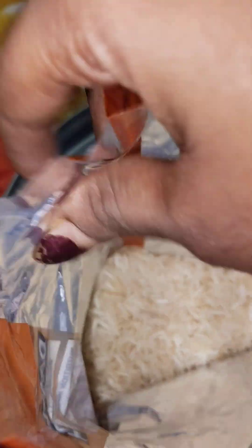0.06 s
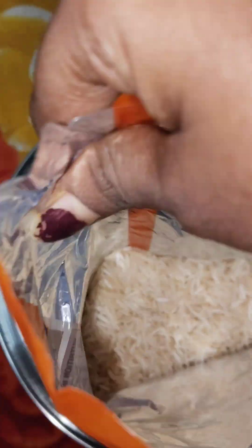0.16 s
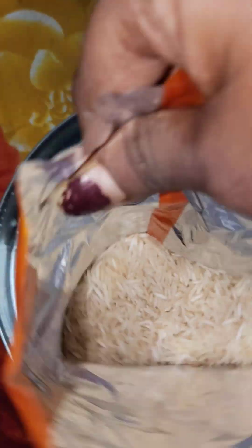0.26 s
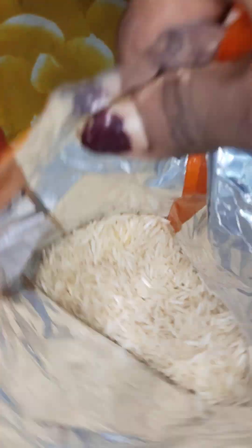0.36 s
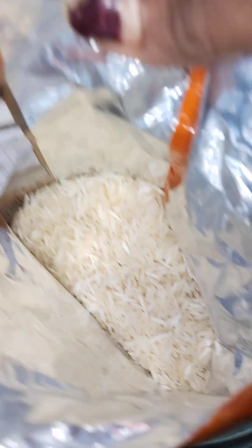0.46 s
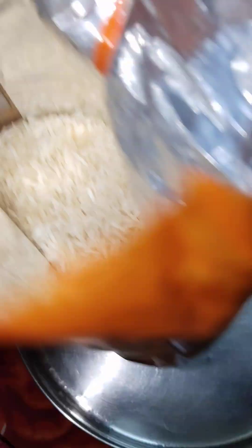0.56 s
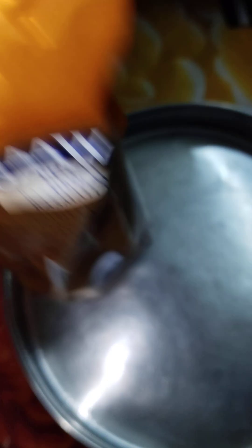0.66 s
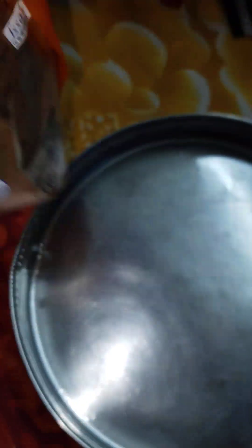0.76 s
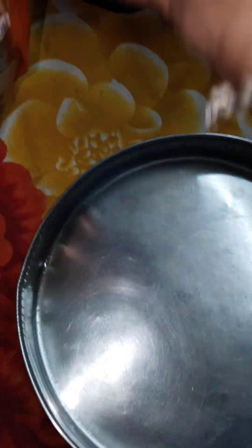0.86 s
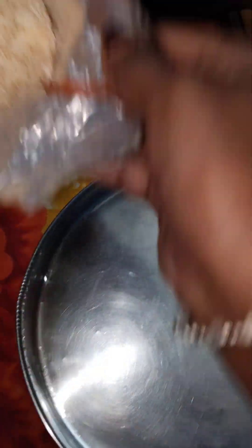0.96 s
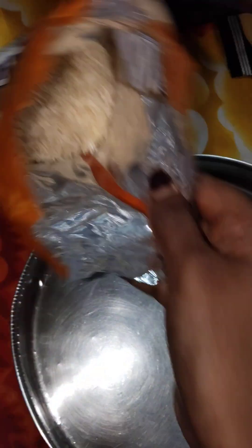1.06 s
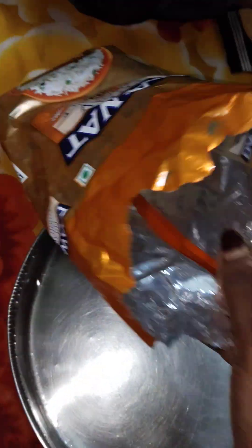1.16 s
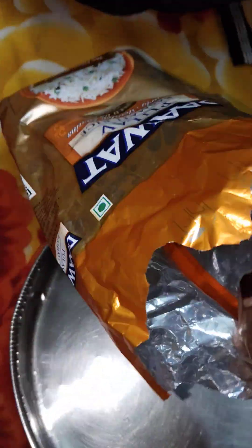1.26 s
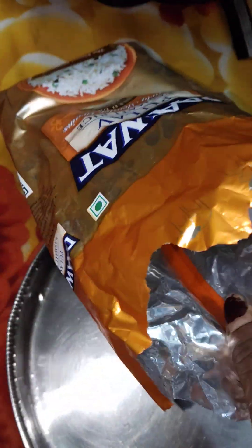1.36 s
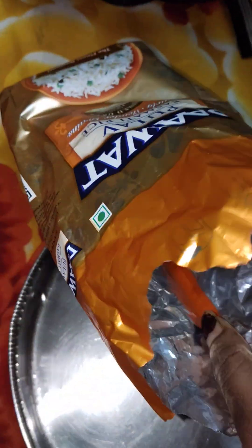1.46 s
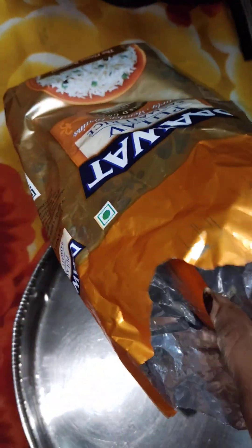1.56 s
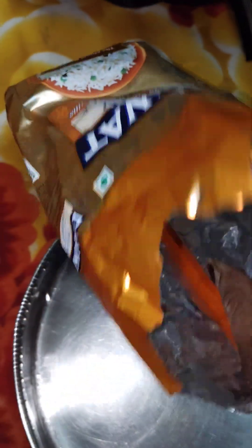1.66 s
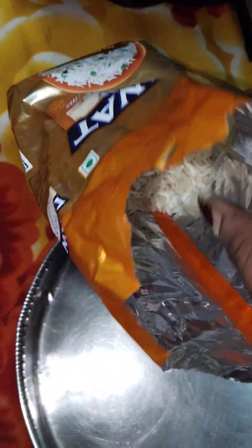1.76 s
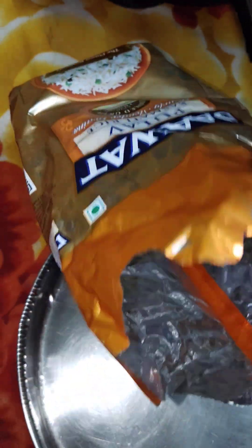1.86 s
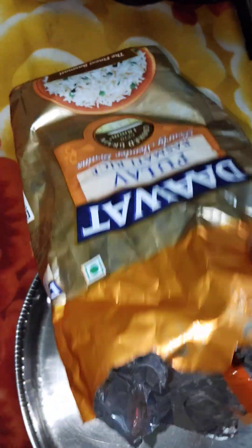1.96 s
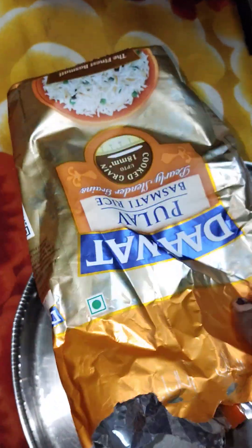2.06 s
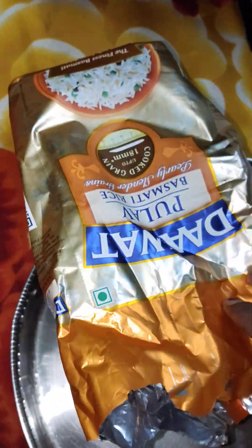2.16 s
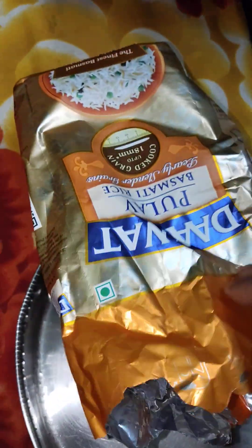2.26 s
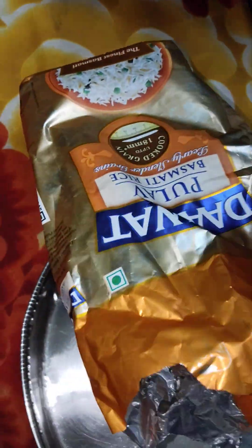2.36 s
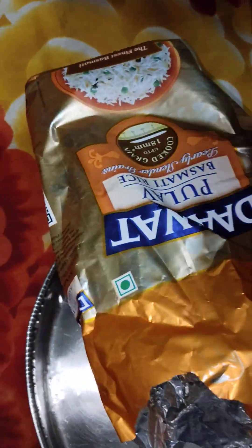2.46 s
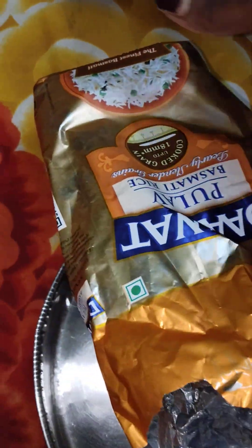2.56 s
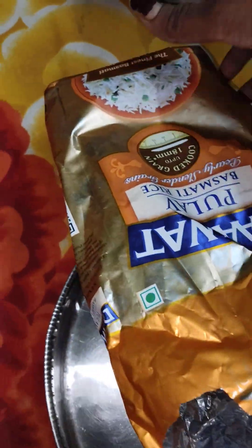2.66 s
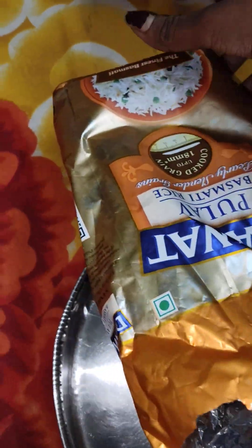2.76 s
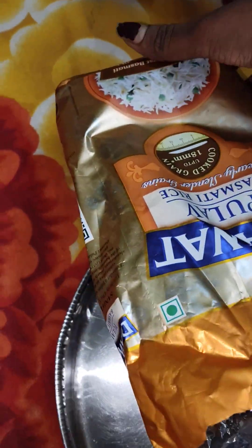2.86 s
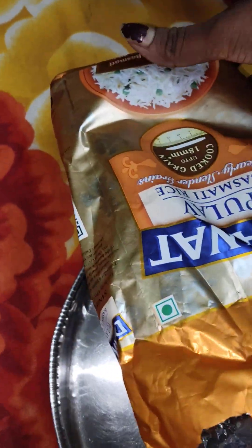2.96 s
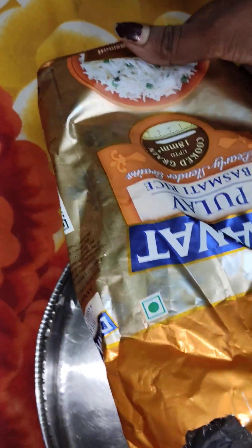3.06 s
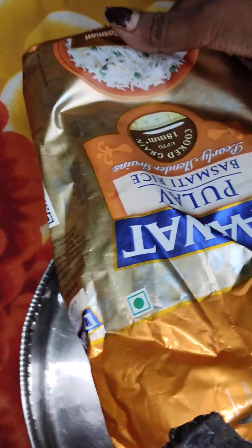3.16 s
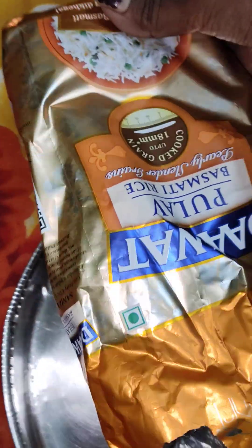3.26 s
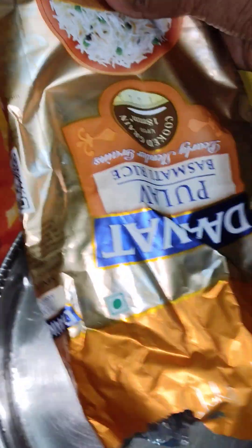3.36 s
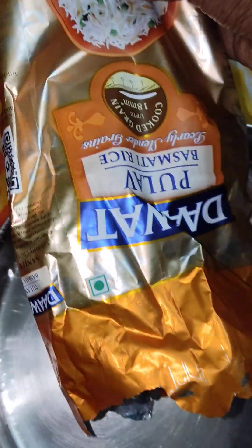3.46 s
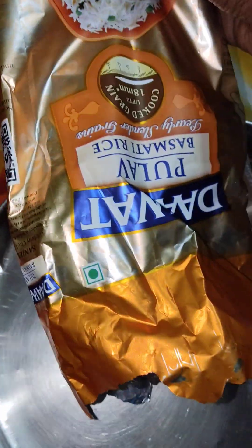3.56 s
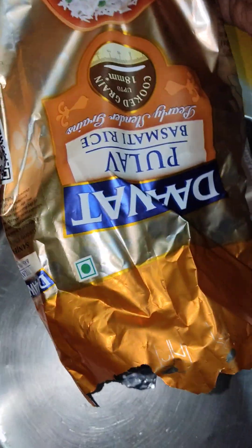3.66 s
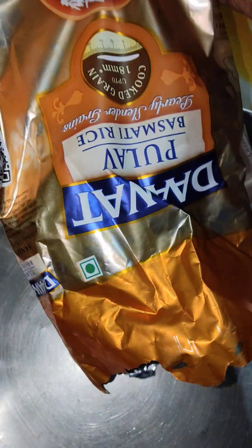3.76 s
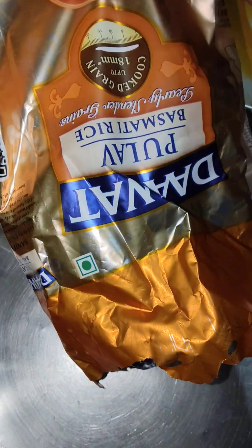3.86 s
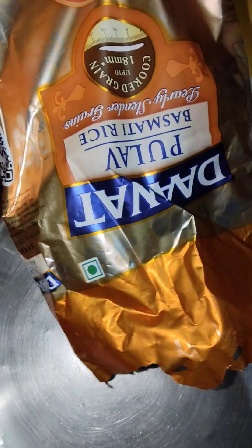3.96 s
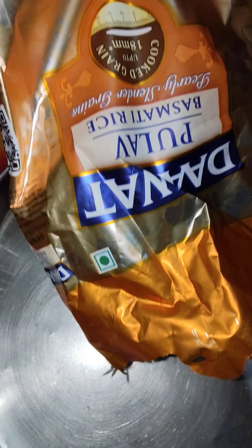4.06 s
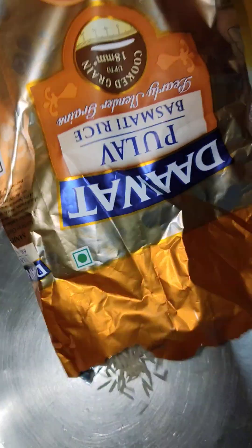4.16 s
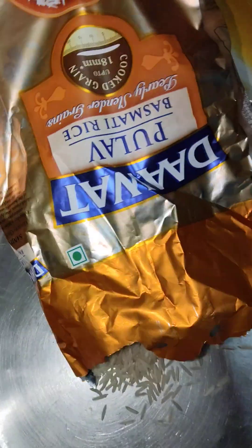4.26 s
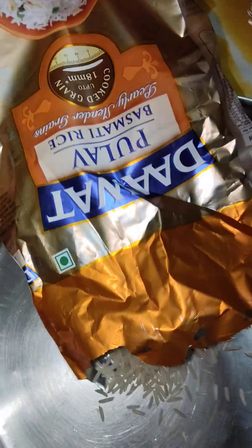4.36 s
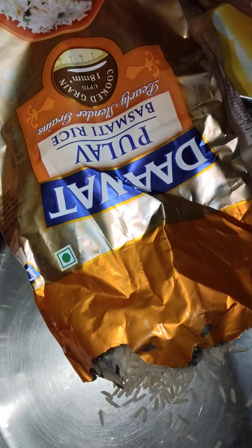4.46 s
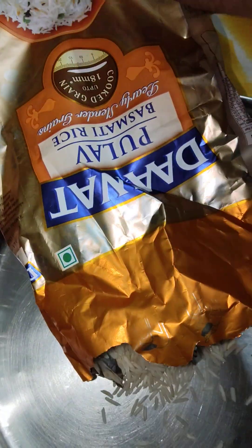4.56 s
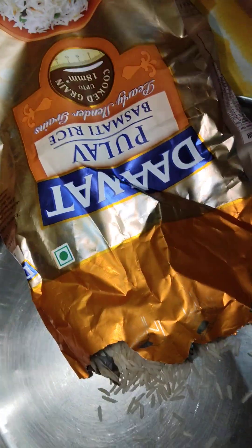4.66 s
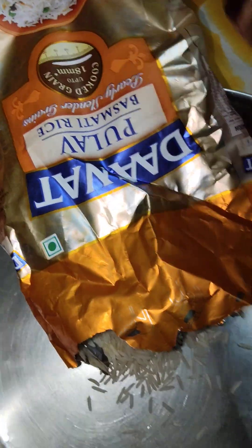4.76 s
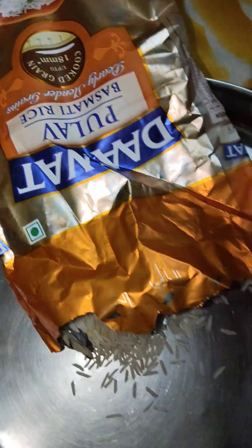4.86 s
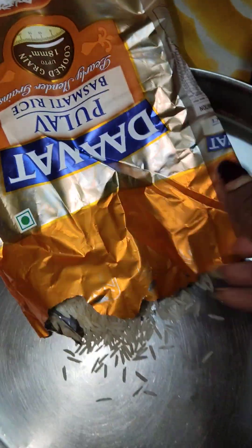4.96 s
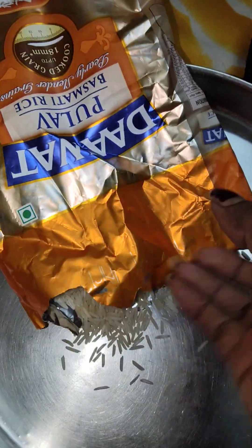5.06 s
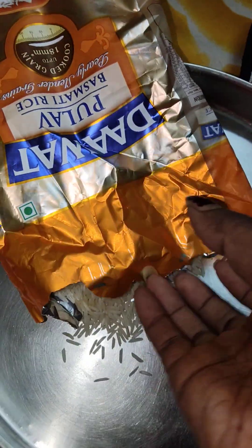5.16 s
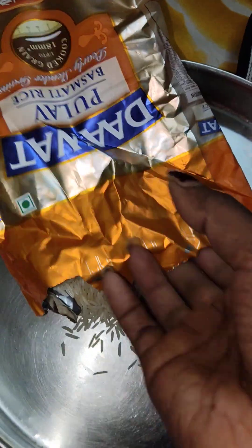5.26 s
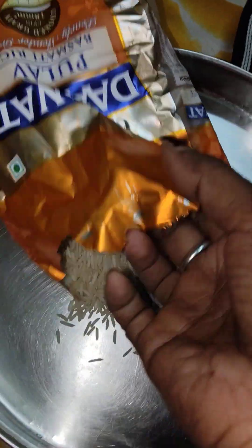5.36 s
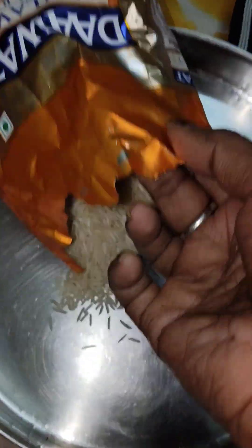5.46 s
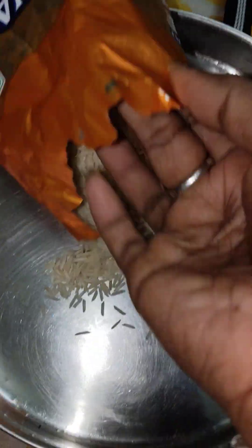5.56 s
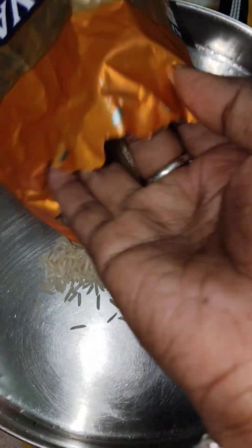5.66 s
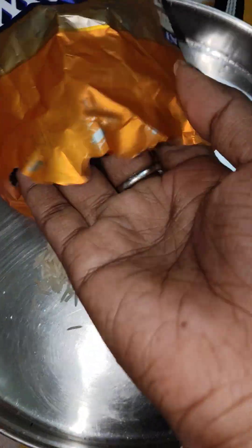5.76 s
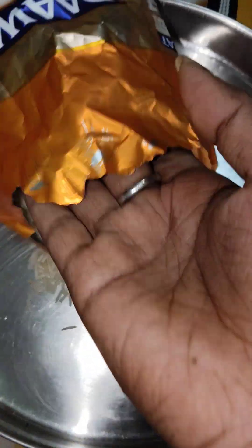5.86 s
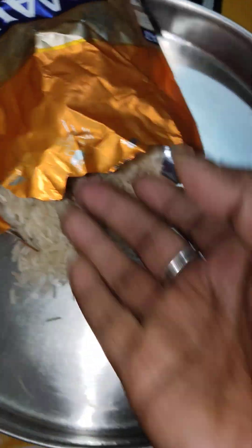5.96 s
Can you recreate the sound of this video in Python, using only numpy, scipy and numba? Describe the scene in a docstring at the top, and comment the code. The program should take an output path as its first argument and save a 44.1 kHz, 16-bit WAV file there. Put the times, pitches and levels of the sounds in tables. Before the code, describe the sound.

A stiff foil-lined bag crackles close to the microphone, then dry rice slides out with a hissing rattle onto a steel plate.

```python
"""In a small furnished room, a foil-lined bag of dry rice is handled close to a microphone,
laid on a steel plate, lifted and tipped out. Creases snap through and ring the stiff film and the air
in the pouch, over a rustle of tiny wrinkles. Sliding rice is a dense hiss of filtered impacts; landing
grains ring the plate's modes. Dull knocks, pushed air, faint hiss and room reflections join them."""
import sys
import numpy as np
from scipy import signal
from scipy.fft import rfft, irfft
from scipy.io import wavfile
from scipy.ndimage import uniform_filter1d
from numba import njit

SR = 44100
rng = np.random.default_rng(int(sys.argv[2]) if len(sys.argv) > 2 else 0)


def waveform_to_disk(signal):
    """Save audio, clipped to [-1, 1], as 16-bit WAV at the path in sys.argv[1]."""
    frames = np.transpose(np.atleast_2d(signal))
    scaled = np.clip(frames, -1, 1) * 32767
    samples = np.round(scaled).astype(np.int16)
    wavfile.write(sys.argv[1], SR, samples)


N = 264600
TIME = np.arange(N) / SR  # seconds


def undb(db):
    """Logarithmic level: decibels become an amplitude gain."""
    return 10 ** (np.asarray(db) / 20)


def unit(x):
    """Normalisation: each sound is scaled to an rms of one."""
    return x / np.sqrt(np.mean(x ** 2, axis=-1, keepdims=True) + 1e-18)


def band(x, lo_hz, hi_hz, order=2):
    """Band limitation by a causal Butterworth filter."""
    sos = signal.butter(order, [lo_hz, min(hi_hz, .48 * SR)], "band", fs=SR, output="sos")
    return signal.sosfilt(sos, x)


def resonate(x, hz, q):
    """Simple resonance, with a gain of one at its centre."""
    return signal.lfilter(*signal.iirpeak(hz, max(q, 1), fs=SR), x)


@njit
def sweep(x, hz, q):
    """Moving resonance: a state-variable band-pass whose centre follows hz."""
    y, b, low = np.empty(len(x)), 0., 0.
    for i in range(len(x)):
        g = np.tan(np.pi * hz[i] / SR)
        v = (b + g * (x[i] - low)) / (1 + g * (g + 1 / q))
        b, low, y[i] = 2 * v - b, low + 2 * g * v, v / q
    return y


def modes(pushes, pitches_hz, q):
    """Modal superposition: each push (a row) rings its own short modes of equal strength."""
    length = pushes.shape[-1]
    rings = (sweep(pushes.ravel(), np.repeat(hz, length), float(q)) for hz in pitches_hz.T)
    return unit(sum(unit(ring.reshape(pushes.shape)) for ring in rings))


def colour(x, points):
    """Spectral shaping: a long sound is weighted by (Hz, dB) points on a log frequency axis."""
    hz, db = np.transpose(points)
    f = np.arange(N // 2 + 1) * SR / N
    gain = undb(np.interp(np.log(f + 1), np.log(hz), db))
    return irfft(rfft(x) * gain, N)


def walk(rate):
    """Slow random modulation: smoothed steps, rate a second, with an rms of one."""
    k = int(SR / rate)
    steps = np.repeat(rng.standard_normal(N // k + 1), k)
    return unit(uniform_filter1d(steps, k)[:N])


def clicks(rate, spread_db):
    """Poisson impacts: rate impulses a second, of random sign and exponentially spread level."""
    out = 1. * (rng.random(N) < rate / SR)
    at = np.flatnonzero(out)
    pool = N // 32
    size = undb(spread_db * np.minimum(rng.exponential(size=pool), 3.2))
    signed = size * rng.choice([-1, 1], pool)
    out[at] = np.resize(signed, len(at))
    return out


def crackle(rate, spread_db, q):
    """Impact excitation: every tiny impact rings for a few cycles at one of twenty pitches."""
    pitches = np.geomspace(200, 14500, num=20)
    return unit(sum(resonate(clicks(rate / len(pitches), spread_db), hz, q) for hz in pitches))


def fade_top(x, top_db, bright_db=-40, slope=.9):
    """Level-dependent brightness: the range above 11.9 kHz fades when the treble level is low."""
    dull = signal.sosfiltfilt(signal.butter(8, 11900, fs=SR, output="sos"), x)
    fizz = x - dull
    return dull + fizz * undb(np.clip(slope * (top_db - bright_db), -20, 0))


def follow(rows, at, column=1):
    """Envelope interpolation: a level curve in dB, silent outside its span."""
    rows = np.array(rows)
    return np.interp(at, rows[:, 0], rows[:, column], left=-120, right=-120)


# Share of the sharpness that goes to the crack and to the tick
CRACK_SHARE, TICK_SHARE = 0.9, 1.16


def registers(panel_db, sharp_db, pouch_db):
    """Spectral balance of pouch, panel, crack and tick: a sharper fold sends more to the top."""
    crack_db = panel_db + CRACK_SHARE * sharp_db
    tick_db = panel_db + TICK_SHARE * sharp_db
    return np.array([panel_db + pouch_db, panel_db, crack_db, tick_db])


# The registers of the film: pouch, panel, crack and tick.
# Each row: lower edge in Hz, upper edge in Hz.
REGISTER_BANDS = [(130, 650), (650, 3000), (3000, 7000), (7000, 16000)]


def played(grains, levels_db, gains_db):
    """Subband synthesis: each register of a stream of grains follows its own level."""
    gains = uniform_filter1d(undb(levels_db), size=200)
    stream = 0
    for (lo, hi), gain, db in zip(REGISTER_BANDS, gains, gains_db):
        stream = stream + unit(band(grains, lo, hi, order=4)) * gain * undb(db)
    return fade_top(stream, levels_db[-1] + gains_db[-1], bright_db=-39.5, slope=.9)


# Spectrum of the faint room hiss. Each row: frequency in Hz, relative level in dB.
HISS_COLOUR = [(30, -15.5), (80, 4.5), (160, 3.5), (500, 3), (800, -9), (1500, -5), (3400, -17.5),
               (4500, -13.5), (5350, 3.5), (6300, -40.5), (8750, -1), (11000, -27.5), (13000, -39.5),
               (16000, -45)]
HISS_DB = -69.5


def room_hiss():
    """Stationary noise: coloured Gaussian noise at a steady low level."""
    return undb(HISS_DB) * unit(colour(rng.standard_normal(N), HISS_COLOUR))


# Spectrum of the rustling film. Each row: frequency in Hz, relative level in dB.
FILM_COLOUR = [(60, -28.5), (130, -8), (240, -4), (420, -6.5), (750, -11), (1150, -5), (1700, 0),
               (2300, -6), (2900, -8), (4000, -6.5), (5500, -11.5), (7000, -14), (8900, 2), (11000, -6.5),
               (15500, -24.5)]
# Effort of the hand in each move. Each row: time in seconds, rustle level in dB before RUSTLE_DB.
HOLD_OPEN = [(0, -47), (0.17, -47), (0.27, -33), (0.4, -42.5), (0.47, -32.5), (0.54, -47.5)]
EASE_OFF = [(0.5, -29.5), (0.62, -53.5), (0.68, -49), (0.84, -49.5)]
TIP_OVER = [(0.84, -51.5), (0.9, -48), (0.99, -55), (1.13, -43.5), (1.2, -29.0), (1.27, -29.5), (1.38, -35),
            (1.52, -55)]
LAY_DOWN = [(1.52, -62), (1.59, -41), (1.8, -53), (1.86, -36.5), (2.06, -52)]
LET_GO = [(2.06, -57.5), (2.14, -32.5), (2.26, -40), (2.43, -50), (2.51, -71)]
LIFT_END = [(2.92, -92), (2.958, -58.5), (3.0, -89.5), (3.12, -75.5), (3.175, -51), (3.22, -60.5),
            (3.3, -60.5), (3.42, -43)]
REACH_IN = [(5, -70), (5.09, -44), (5.18, -54.5), (5.39, -50.5), (5.51, -43.5), (5.62, -38), (5.76, -42),
            (6, -47.5)]
# The moves of the hand: a slack bag sounds dull and full, a taut one sharp and thin.
# Each row: effort curve, sharpness in dB, pouch against panel in dB.
MOVES = [(HOLD_OPEN, -9.5, 1.5), (EASE_OFF, -19, -1), (TIP_OVER, -2.5, -12.5), (LAY_DOWN, -8.5, -0.13),
         (LET_GO, -4, -3.5), (LIFT_END, -1, -8), (REACH_IN, -7, -1.5)]
RUSTLE_DB = -1.5


def rustle():
    """Random buckling: tiny wrinkles give way in flurries while film and grains rub."""
    wrinkles = crackle(rate=1900, spread_db=-2.5, q=5)
    wrinkles = wrinkles + undb(-4) * unit(clicks(rate=290, spread_db=3.0))
    flurries = undb(6.5 * walk(rate=110))
    rubbing = undb(-3.5) * rng.standard_normal(N)
    grains = colour(unit(wrinkles * flurries) + rubbing, FILM_COLOUR)
    grains = grains + .6 * resonate(grains, 8900, 8)
    moves = [registers(follow(curve, TIME) + RUSTLE_DB, sharp, pouch) for curve, sharp, pouch in MOVES]
    # the strongest move sets each register
    return played(grains, np.max(moves, axis=0), gains_db=(1.2, 1.5, 0.52, 2.7))


# Slow air pushed at the microphone, strongest while the bag is held close.
# Each row: time in seconds, level in dB against the low handling sound.
DRAUGHT = [(0, -13), (0.42, -23), (0.6, -37), (2.3, -29.5), (3.5, -45.5)]


def draught(handling):
    """Air displacement: low noise follows the short-term rms of the handling sound."""
    power = uniform_filter1d(band(handling, 100, 490) ** 2, size=1500)
    effort = np.sqrt(np.abs(power))
    air = unit(band(rng.standard_normal(N), 55, 140))
    return undb(np.interp(TIME, *np.transpose(DRAUGHT))) * effort * air


# Dull knocks of the hand and the heavy bag, and at 4.73 s a faint low ring of the plate. # Each row: start in
# seconds, frequency in Hz, level in dB, decay time constant in seconds.
KNOCKS = [(0.001, 274, -18, 0.0029), (0.031, 102, -28.5, 0.028), (0.056, 137, -19, 0.01),
          (0.941, 244, -49.5, 0.06), (2.148, 176, -25.5, 0.018), (2.22, 239.7, -43.5, 0.11),
          (4.73, 316, -60, 0.16)]


def knocks(rise_s=0.0018):
    """Damped oscillation: soft, low swings of the filled bag, and the plate's low ring, die away exponentially."""
    out = np.zeros(N)
    for s, hz, db, decay_s in KNOCKS:
        t = np.maximum(TIME - s, 0)
        envelope = np.exp(-t / decay_s) * (1 - np.exp(-t / rise_s))
        out += undb(db) * np.sin(2 * np.pi * hz * t) * envelope
    return out


# Lesser creases: level against the hand's effort and its random spread (dB)
LESSER_DB, LESSER_SPREAD_DB = -1, 2.5
# their usual panel (Hz), sharpness (dB), pouch (Hz) and pouch against panel (dB)
LESSER_HZ, LESSER_SHARP_DB, LESSER_POUCH_HZ, LESSER_POUCH_DB = 1720, -5.5, 407, -12.5
# A tripped neighbour: time scale of its lag (s), level against the snap and limit over the effort (dB)
TRIP_S, TRIP_DB, TRIP_LIMIT_DB = .009, -12.5, 7


def lesser_creases(count=190, rice_db=-4):
    """Triggered instability: small creases give way beside each snap, others at random with effort."""
    snap_s, snap_db = np.transpose(SNAPS)[:2]
    stray_s = (np.arange(count) + rng.random(count)) / count * TIME[-1]
    chance = np.clip(rng.standard_normal((count + len(SNAPS), 6)), -1.6, 1.6)
    size, pitch, sharp, hollow, full, lag = chance.T
    # neighbours mostly follow their snap, a few just precede it
    tripped_s = snap_s + TRIP_S * (.4 + lag[count:] / 2)
    s = np.concatenate([stray_s, tripped_s])
    # the hand or the sliding rice works the film, whichever is stronger
    effort = np.max([follow(curve, s) for curve, _, _ in MOVES] + [follow(POUR, s) + rice_db], axis=0)
    stray_db = effort[:count] + LESSER_DB
    tripped_db = np.minimum(snap_db + TRIP_DB, effort[count:] + TRIP_LIMIT_DB)
    db = np.concatenate([stray_db, tripped_db]) + LESSER_SPREAD_DB * size
    return np.column_stack([s, db, LESSER_HZ * 2 ** (.4 * pitch), LESSER_SHARP_DB + 5 * sharp,
                            LESSER_POUCH_HZ * 2 ** (.4 * hollow), LESSER_POUCH_DB + 5 * full])


# Creases snapping through. Each row: start in seconds, strength in dB, film panel in Hz,
# sharpness in dB, pouch in Hz, pouch against panel in dB.
SNAPS = [(0.0153, -28.5, 1236, -18, 514, -2.5), (0.0475, -24, 2080, -17.5, 244, -13),
         (0.222, -36, 1750, -19.5, 286, -6), (0.2246, -15, 1340, -36.5, 340.0, -15.5),
         (0.2492, -20.5, 1713, -8.5, 360.0, -4), (0.26, -28.5, 1100, -15, 390.0, 6),
         (0.2657, -34.5, 1660.0, -14, 356, 8), (0.269, -16.5, 1140, -3.5, 330.0, -9),
         (0.2768, -22.5, 1460.0, -7, 300.0, -3.5), (0.2857, -22, 2360, 0.5, 456, -16),
         (0.291, -22, 2180, 4, 402, -22), (0.3071, -20.5, 1690.0, -1.5, 350.0, -10),
         (0.3324, -24.5, 1413, -6, 470.0, -18), (0.3485, -23, 2154, -3.5, 442, -2),
         (0.3706, -33.5, 1280, -19.5, 443, 7), (0.4363, -12, 1850, -7.5, 444, -4),
         (0.4564, -23.5, 1500, -6.5, 452, -12), (0.53, -25, 1010, -19, 385, 6),
         (0.5654, -29.5, 2350, -43, 320.0, -0.5), (0.5968, -27.5, 1130, -37, 364, -8),
         (0.658, -26.5, 1070, -26, 368, -2.5), (0.6629, -32.5, 1870.0, -7.5, 318, 0.5),
         (0.674, -29.5, 1140.0, -33, 433, -6), (0.6909, -30, 1350.0, -13.5, 410.0, -13),
         (0.6982, -35.5, 1710, -23, 300.0, -1), (0.742, -30, 2500, -30, 444, -18),
         (0.786, -25.5, 1770, -8.5, 514, -9.5), (0.8772, -19, 2400, -13, 340.0, -18.5),
         (0.9357, -34.5, 2500, -14, 290.0, 0), (1.0378, -28, 2340, -10, 450.0, -33),
         (1.0672, -34.5, 2090, -19.5, 280, -15), (1.0944, -23.5, 1670.0, 5, 510.0, -29),
         (1.1137, -29, 1620, 2, 530.0, -12), (1.161, -33, 2340, 2.5, 497, -10),
         (1.1747, -21, 1980, 1, 550, -1.5), (1.2185, -25, 1620, 3, 460.0, -10),
         (1.231, -26.5, 2070.0, -29, 328, -10), (1.251, -31, 1680, 8, 544, 5.5),
         (1.2602, -21, 1650, -17.5, 536, -2.5), (1.267, -26.5, 2000.0, 7.5, 470.0, -2.5),
         (1.3776, -32, 2340.0, 4, 380.0, -20), (1.5653, -29.5, 1980, -5.5, 470, -4.5),
         (1.624, -30.5, 2500, 2.5, 454, -5), (1.6957, -44, 1660, 1, 410.0, -1),
         (1.8364, -31.5, 1294, -2, 313, -0.5), (1.861, -24, 1670, -13.5, 255.3, 1.5),
         (1.8883, -28.5, 1660, -6, 414, -13), (1.945, -31.5, 1440, -7.5, 437, -16.5),
         (2.094, -25.5, 1590, -20, 432, -12), (2.1284, -27, 2200.0, 0, 410.0, -6),
         (2.1374, -24, 1700, -11, 440.0, -4.5), (2.15, -27, 1510, -18.5, 269, 4),
         (2.1786, -29, 1770, 10, 403, 6.5), (2.2975, -36, 980, -1, 370.0, 1.5),
         (2.4011, -39.5, 1020.0, -6.5, 426, 3.5), (2.4165, -31, 1880.0, -11, 380, -16),
         (2.453, -38, 1790, -10, 510.0, -31), (2.567, -34.5, 1480, -48, 488, -23.5),
         (2.7446, -32.5, 2130, -8, 492, -38), (3.1695, -41.5, 2630.0, 1, 454, -29),
         (3.252, -37.5, 2770, -8, 342, -4), (3.35, -59, 2880, 16, 364, 10),
         (3.375, -32.5, 1140, -13, 530, -3.5), (3.425, -21.5, 1010, 1.5, 483, 2),
         (3.4673, -22.5, 1730, 5, 527, -0.5), (3.4947, -15.5, 1260, -9.5, 428, -7),
         (3.65, -24, 2310, -6, 412, -5.5), (3.7016, -39.5, 2010, 14.5, 570.0, -9),
         (3.7459, -23, 1380, -16.5, 460.0, -8), (3.7972, -23.5, 920, -10, 327, -7.5),
         (3.8184, -29.5, 1550.0, -1.5, 400, 5), (3.8265, -18.5, 1780, -2.5, 350.0, -6.5),
         (3.8592, -25, 2110.0, 1, 600.0, -2.5), (3.8808, -20.5, 2040.0, -7, 580.0, -11),
         (3.889, -25, 1060, -0.5, 420.0, -12.5), (3.8998, -17.5, 1530, -8, 566, -3),
         (3.9214, -16, 1950, -8, 510, -6.5), (4.3036, -18, 1490, -14, 310.0, -11.5),
         (4.3254, -21, 2020.0, -10, 462, -0.5), (4.3366, -20.5, 1415, -16, 464, -6.5),
         (4.3559, -21, 1550, -12, 537, -22), (4.4324, -30, 1280.0, -9, 466, -2),
         (4.4822, -28, 1410, -8, 493, -11), (4.5093, -24.5, 1230, -28, 490, -7),
         (4.5539, -25, 1540.0, -29, 425, -7.5), (5.0274, -38, 1850.0, -9, 430.0, -5.5),
         (5.0588, -35.5, 1740, -7.5, 380, -6.5), (5.103, -21.5, 1270, -15.5, 483, -15),
         (5.2369, -26, 1830, -4, 320.0, -45), (5.2954, -35, 1460, -2.5, 600.0, -15),
         (5.373, -29, 2100, -26, 480.0, -33), (5.425, -37.5, 1210.0, 1.5, 594, -6),
         (5.452, -30.5, 1960, -16, 587, -13), (5.4955, -28.5, 1110, -4, 282, -1.5),
         (5.503, -28, 1520, -8, 493, -7), (5.5443, -24, 1212, -5.5, 368, -20),
         (5.579, -28, 1200, -8, 394.3, -4), (5.6052, -26.5, 1270, -6.5, 322.6, 7),
         (5.6913, -27.5, 1440, -12, 285, -1), (5.6994, -22, 1780, -7, 254, 0),
         (5.8092, -23.5, 1600, -14, 587, -16), (5.9011, -32, 1300.0, -5, 250.0, 3)]


def snaps(flip_s=.0015, decay_s=0.007, decay_db=-17, fade_in_s=.0018, fade_in_db=-15,
          panel_q=6, pouch_q=5, tick_hz=8900, tick_q=14):
    """Snap-through buckling: a crease flips, rings its panel of film and puffs the air in the pouch."""
    lead, length = 300, 1300  # samples
    creases = np.vstack([SNAPS, lesser_creases()])
    s, strength_db, panel_hz, sharp_db, pouch_hz, full_db = creases.T[:, :, None]
    pouch_db, panel_db, crack_db, tick_db = registers(strength_db, sharp_db, full_db)
    t = (np.arange(length) - lead) / SR
    after = np.maximum(t, 0)
    buckle, noise, air = rng.standard_normal((len(s), 3, length)).swapaxes(0, 1)
    shape = rng.random((len(s), 7))

    # a crease flips with a short noisy fade-in and a crackling decay
    flip = np.sign(buckle) * np.exp(-(after / flip_s) ** 2) * (1 - np.exp(-after / .00036))
    fade_in = undb(fade_in_db) * np.exp(-np.abs(t) / fade_in_s)
    decay = undb(decay_db) * np.exp(-after / decay_s)
    envelope = np.where(t < 0, fade_in, decay)
    push = flip + envelope * noise * np.abs(noise) / 2

    heave = air * (t > 0) * np.exp(-after / .003)
    pouch = modes(band(push, 140, 1700, order=4), pouch_hz, pouch_q)
    pouch = pouch + undb(-3.5) * unit(band(heave, 200, 520, order=3))
    # every panel has its own size and shape, so its lesser modes differ
    middle = band(push, 680, 2700, order=3)
    lesser_modes = modes(middle, 800 + 2100 * shape[:, :3], q=10)
    panel = modes(middle, panel_hz, panel_q) + undb(-8.5) * lesser_modes
    upper = band(push, 2700, 5430, order=3)
    crack_hz = 3300 + np.array([900, 1900]) * shape[:, 3:5]
    crack = modes(upper, crack_hz, q=4.6) + undb(-3) * unit(upper)
    top = band(push, 6500, 12280, order=3)
    tick_modes_hz = tick_hz * (1 + np.array([.08, .25]) * (shape[:, 5:] - .5))
    tick = modes(top, tick_modes_hz, tick_q) + undb(-8.0) * unit(top)
    tick = fade_top(tick, tick_db, bright_db=-26.5, slope=1.0)

    parts = ((pouch, pouch_db - .4), (panel, panel_db - .2),
             (crack, crack_db - 1.76), (tick, tick_db + 1.9))
    # levels count the energy of a snap over 6 ms
    sounds = np.sqrt(.006 * SR / length) * sum(unit(x) * undb(db) for x, db in parts)
    out = np.zeros(N + 2 * length)
    for start, sound in zip((np.abs(s[:, 0]) * SR).astype(int), sounds):
        out[start:start + length] += sound
    return out[lead:lead + N]


# Spectrum of the knocking rice. Each row: frequency in Hz, relative level in dB.
RICE_COLOUR = [(130, -34.5), (280, -7.5), (480, -8), (800, -11.5), (1400, -0.5), (2100, 0), (3000, -6.5),
               (4000, -5.5), (5300, -8), (7000, -16), (8800, 3.5), (10700, -3.5), (13000, -17.5),
               (16000, -14.5)]
# Air resonances of the bag's mouth as the heap slides towards it.
# Each row: time in seconds, first resonance in Hz, second resonance in Hz.
MOUTH = [(3.45, 1700, 3230), (3.6, 2490, 3500), (3.67, 2440, 3430), (3.75, 1670, 3500), (4.0, 2000, 3880),
         (4.18, 2020, 3990), (4.3, 1550, 3360), (4.6, 1420, 2870)]
# Rice creeping as the bag is lifted, sliding down the film to the plate, and spilling into the hand.
# Each row: time in seconds, rattle level in dB, hiss level in dB.
CREEP = [(2.95, -88.5, -77.5), (3.05, -93.5, -60), (3.42, -80, -74.5)]
POUR = [(3.422, -34.5, -34), (3.47, -33, -42), (3.602, -28, -33.5), (3.78, -31, -33.0),
        (3.92, -30.0, -35.5), (4.16, -33, -35), (4.3, -35.5, -26.0), (4.41, -42.5, -31), (4.47, -44.5, -39),
        (4.56, -37, -37.0), (4.662, -46.5, -49), (4.8, -71, -59), (5.0, -108, -50.5)]
SPILL = [(5.0, -88, -54), (5.3, -69, -59), (5.6, -72, -60), (5.72, -60, -32), (5.86, -55, -41),
         (6.0, -83, -46.5)]
# Low rumble against the rattle, and crack against the mean of rattle and hiss
RUMBLE_DB, SLIDE_CRACK_DB = -16, -4


def pour():
    """Granular flow: thousands of impacts a second on grains and film, coloured by the bag's mouth."""
    knocking = crackle(rate=5500, spread_db=1.5, q=3.1)
    knocking = knocking + undb(-3) * unit(clicks(rate=1500, spread_db=1.5))
    grains = colour(knocking * undb(0.72 * walk(rate=80)), RICE_COLOUR)
    # rice filling the mouth shifts its two resonances
    s, first_hz, second_hz = np.transpose(MOUTH)
    mouth = sum(sweep(grains, np.interp(TIME, s, hz), 5.5) for hz in (first_hz, second_hz))
    grains = grains + 0.89 * mouth + 1.0 * resonate(grains, 7200, 7.9)
    slides = CREEP, POUR, SPILL
    rattle = np.max([follow(slide, TIME, column=1) for slide in slides], axis=0)
    hiss = np.max([follow(slide, TIME, column=2) for slide in slides], axis=0)
    levels = np.array([rattle + RUMBLE_DB, rattle, (rattle + hiss) / 2 + SLIDE_CRACK_DB, hiss])
    return played(grains, levels, gains_db=(0.3, -1.2, -0.33, .6))


# Grains landing on the plate. Each row: time in seconds, grains a second, relative level in dB.
LANDINGS = [(4.151, 300, -44.5), (4.27, 900, -47), (4.42, 500, -37), (4.57, 300, -36), (4.659, 80, -43),
            (4.74, 60, -64), (4.79, 20, -66), (4.98, 17, -80.5), (5.499, 20, -70), (5.62, 200, -37.5),
            (5.802, 150, -45), (5.949, 40, -48)]
# Modes of the steel plate, damped by the cloth under it. Each row: frequency in Hz, relative level in dB.
PLATE_MODES = [(1050, 6), (1264, -4), (1378, 11), (1506, -11.5), (1759, -5), (1920, -6), (2136, -7),
               (2575, -13), (3165, -14.5), (3435, -9), (3690, -6), (4680, -15)]


def plate(t60_s=0.024):
    """Modal impact: each landing grain ticks and strikes the plate's modes in its own proportions."""
    s, rate, db = np.transpose(LANDINGS)
    hits = clicks(np.interp(TIME, s, rate), spread_db=-0.5)
    ring = 0
    for hz, mode_db in PLATE_MODES:
        strikes = hits * rng.standard_normal(N)
        q = np.pi * hz * t60_s / np.log(1000)  # decays 60 dB in t60_s
        ring = ring + undb(mode_db) * unit(resonate(strikes, hz, q))
    ticks = unit(band(hits, 470, 2500))
    return (unit(ring) + ticks) * undb(np.interp(TIME, s, db, left=-120))


# First reflections off the plate and the hand. Each row: delay in seconds, linear gain.
REFLECTIONS = [(.0007, -0.13), (.00135, 0.012), (.0026, 0.2)]
ROOM_T60_S = .21


def room(x, wet_db=-20, delay_s=.007):
    """Reverberation: close surfaces reflect at once, the walls return a short tail, mid-heavy."""
    t = np.arange(SR // 3) / SR
    tail = rng.standard_normal(len(t)) * undb(-60 * t / ROOM_T60_S) * (t > delay_s)
    tail /= np.sqrt(np.sum(tail ** 2))
    tail = .8 * band(tail, 1100, 2300) + band(tail, 250, 14000, order=1)
    early = sum(gain * np.interp(TIME - lag_s, TIME, x, left=0) for lag_s, gain in REFLECTIONS)
    return early + undb(wet_db) * signal.fftconvolve(x, tail)[:N]


# Balance of the two microphone channels. Each row: frequency in Hz, left minus right in dB.
MIC_BALANCE = [(3000, 0), (5500, .7), (8300, 1.6), (10500, .8), (13000, -2.7)]


def stereo(sound):
    """Interchannel level difference: half the balance goes to each side, with opposite sign."""
    return np.array([colour(sound, [(hz, side * db / 2) for hz, db in MIC_BALANCE]) for side in (1, -1)])


def scene():
    """Superposition: bag, rice and plate add to their reflections, the draught and the room hiss."""
    handling = rustle() + knocks() + snaps()
    near = handling + pour() + plate()
    return stereo(near + room(near) + draught(handling) + room_hiss())


TOP_HZ = 15800


def record(dry):
    """Transducer response: a hollow near 7 kHz, clipping at full scale, and a steep cut of the top."""
    heard = dry - 0.67 * resonate(dry, 7070, 3.7)
    top_cut = signal.ellip(10, .2, 75, TOP_HZ, fs=SR, output="sos")
    return signal.sosfilt(top_cut, np.clip(heard, -1, 1))


dry = scene()
out = record(dry)
waveform_to_disk(out)
```